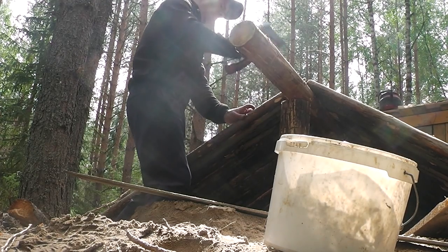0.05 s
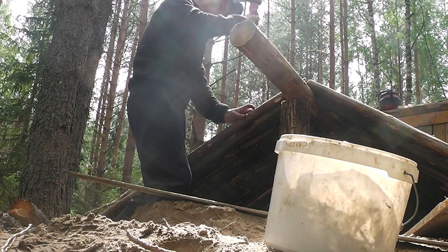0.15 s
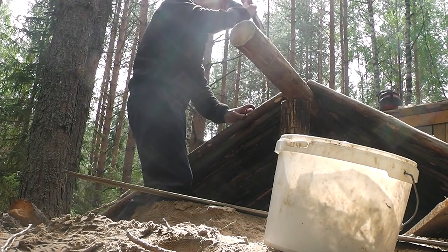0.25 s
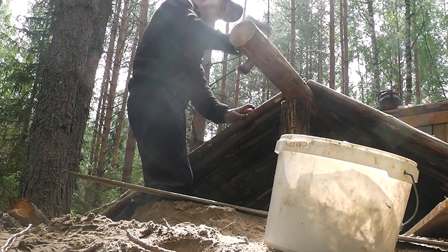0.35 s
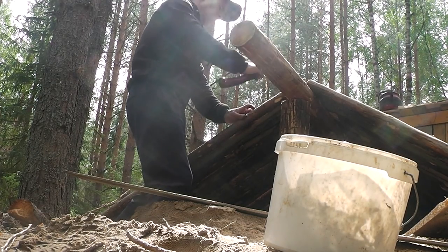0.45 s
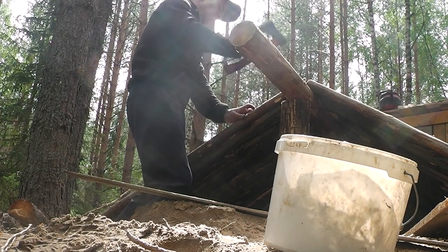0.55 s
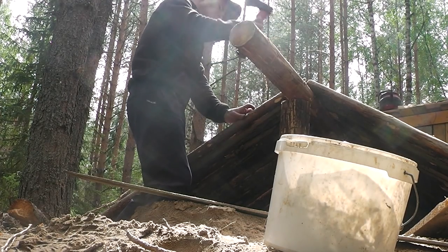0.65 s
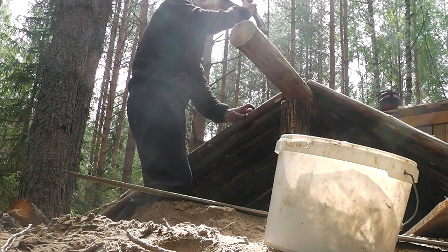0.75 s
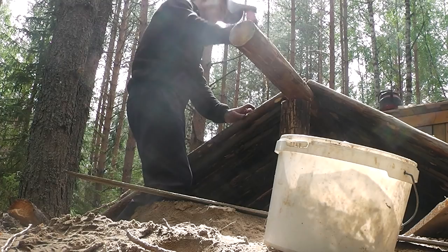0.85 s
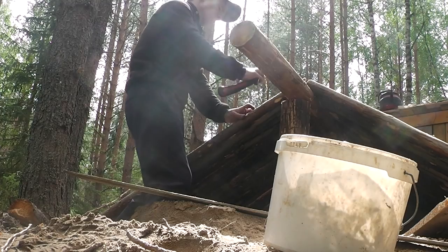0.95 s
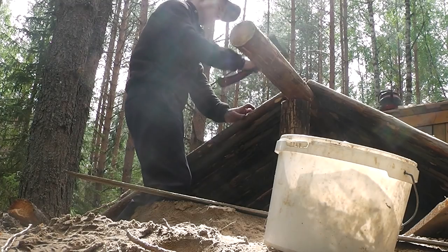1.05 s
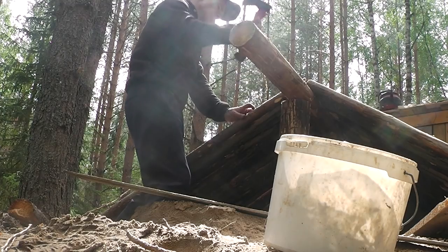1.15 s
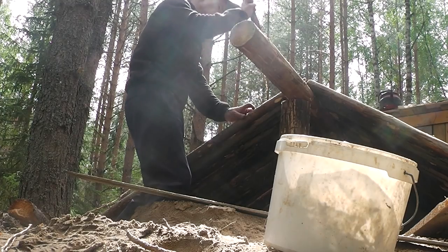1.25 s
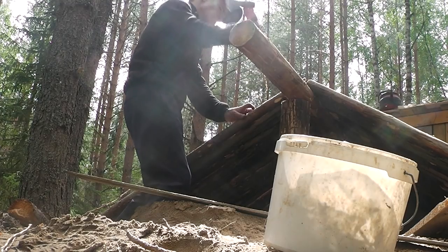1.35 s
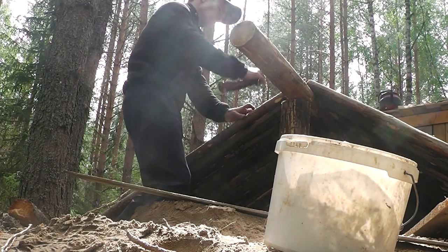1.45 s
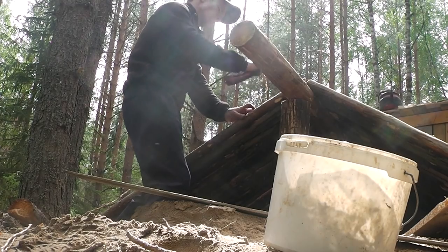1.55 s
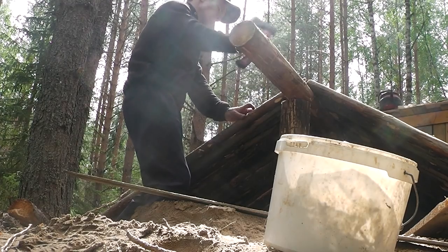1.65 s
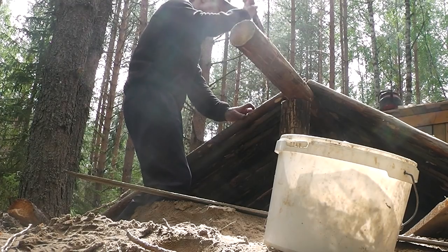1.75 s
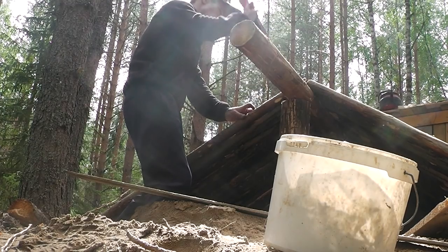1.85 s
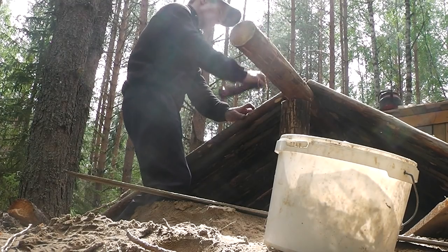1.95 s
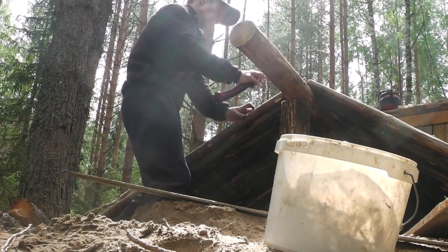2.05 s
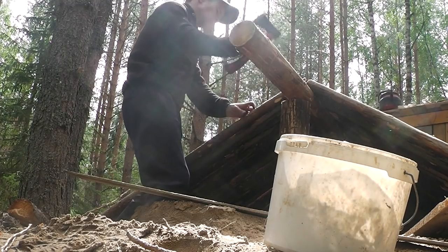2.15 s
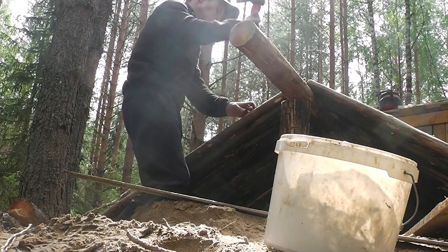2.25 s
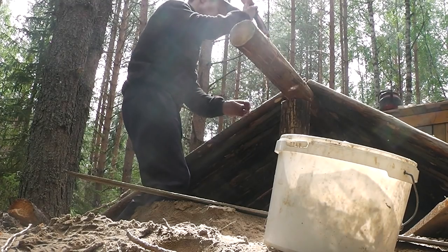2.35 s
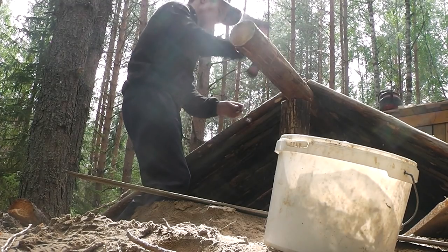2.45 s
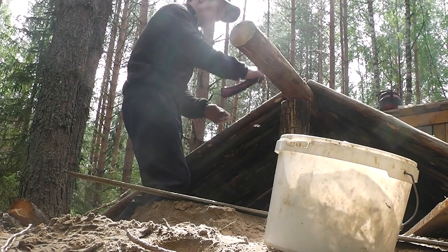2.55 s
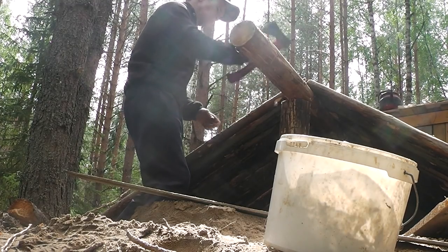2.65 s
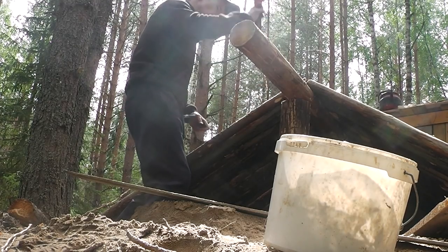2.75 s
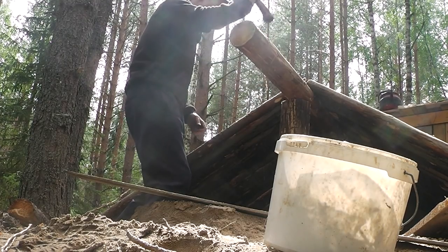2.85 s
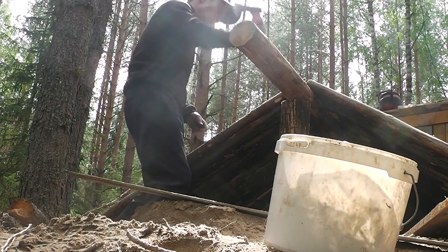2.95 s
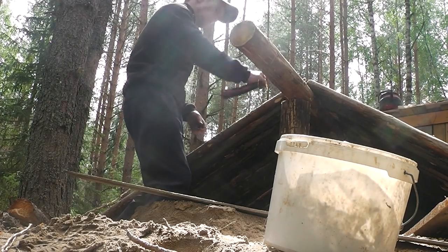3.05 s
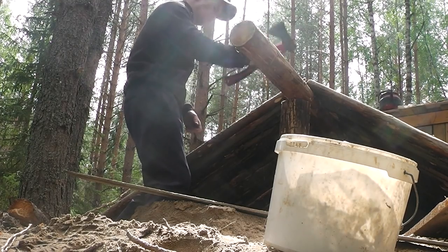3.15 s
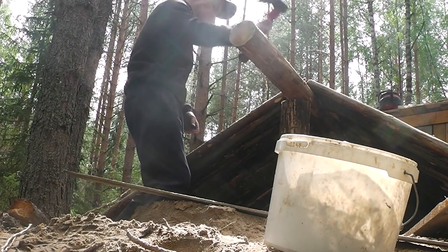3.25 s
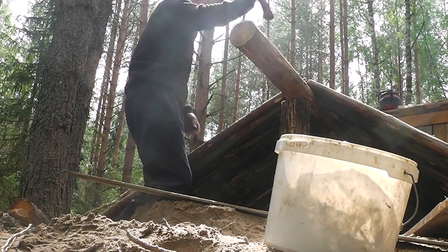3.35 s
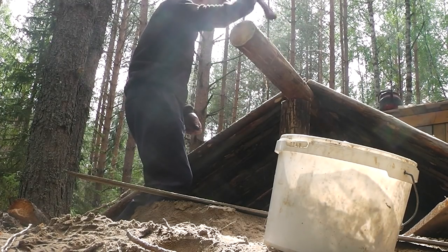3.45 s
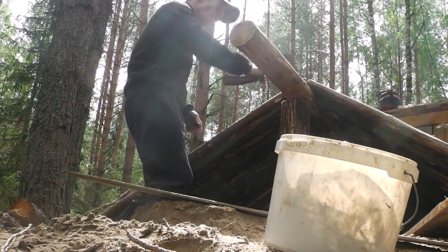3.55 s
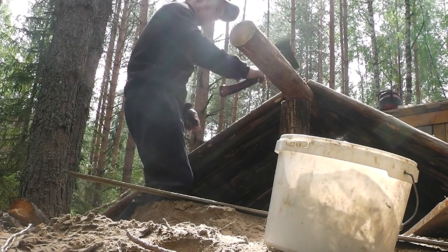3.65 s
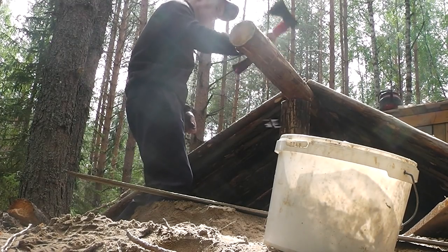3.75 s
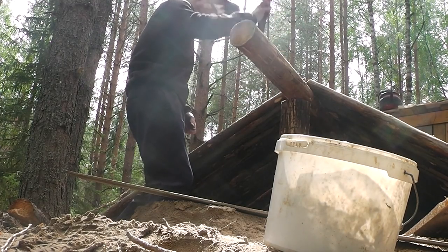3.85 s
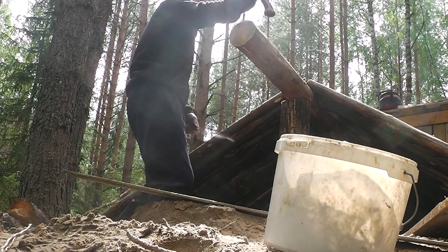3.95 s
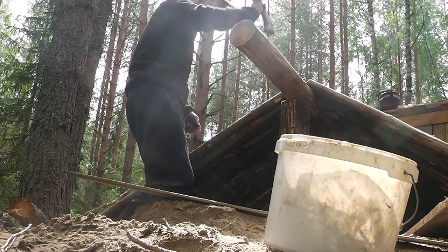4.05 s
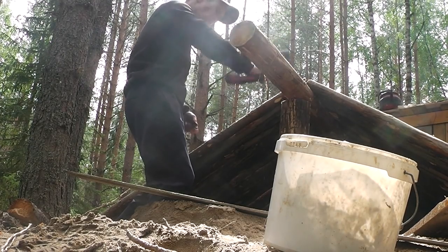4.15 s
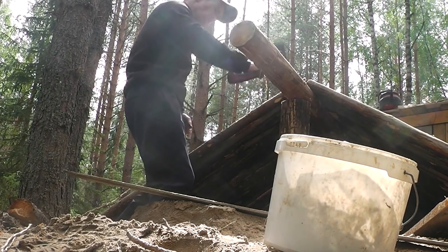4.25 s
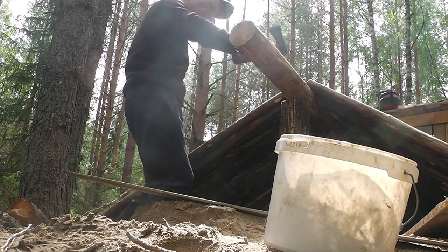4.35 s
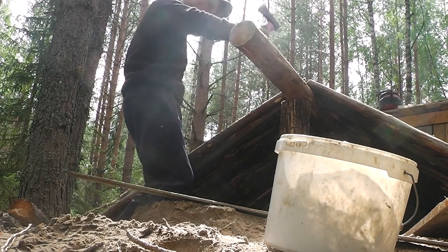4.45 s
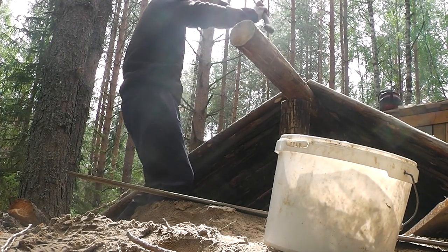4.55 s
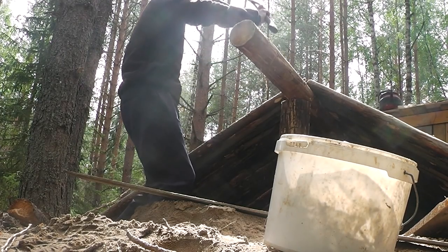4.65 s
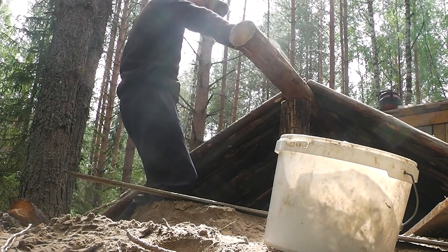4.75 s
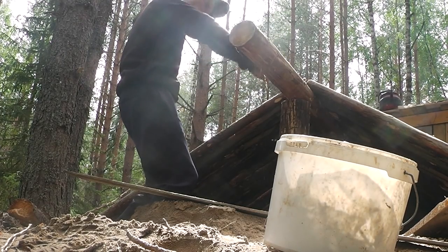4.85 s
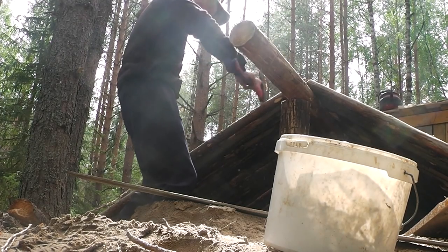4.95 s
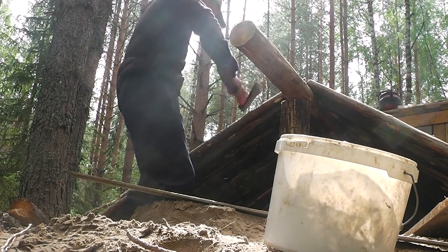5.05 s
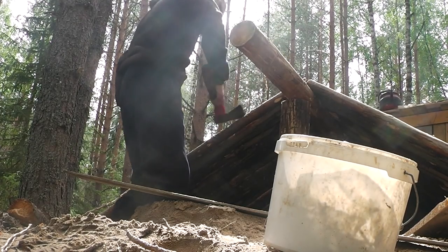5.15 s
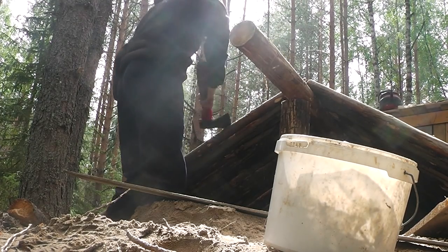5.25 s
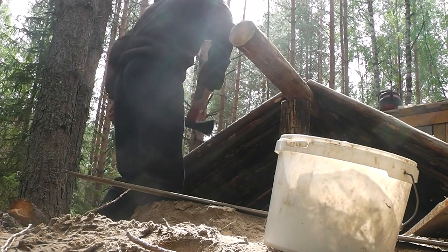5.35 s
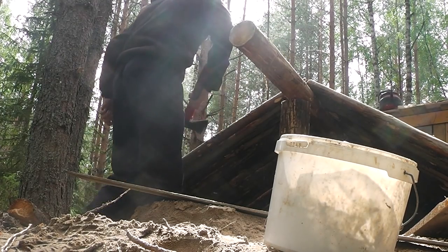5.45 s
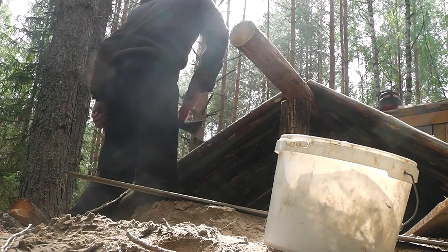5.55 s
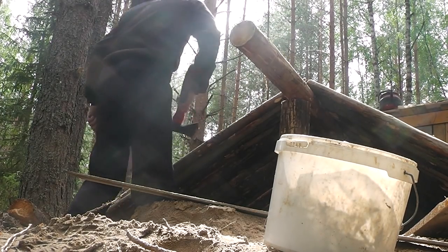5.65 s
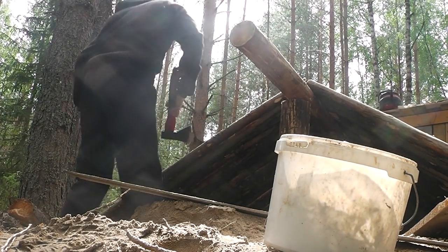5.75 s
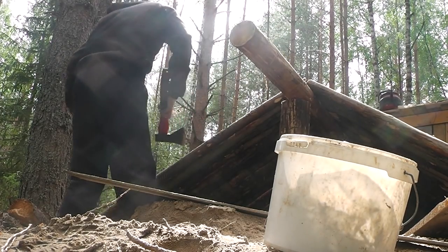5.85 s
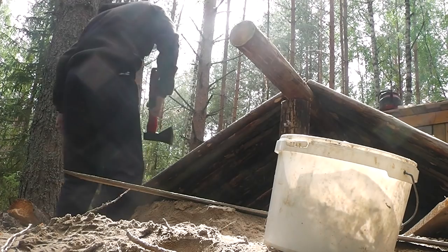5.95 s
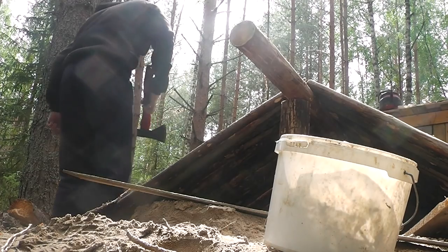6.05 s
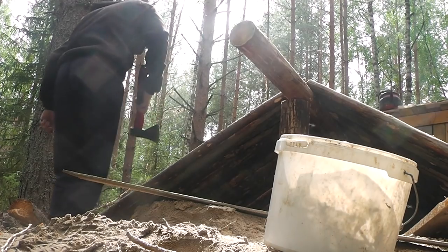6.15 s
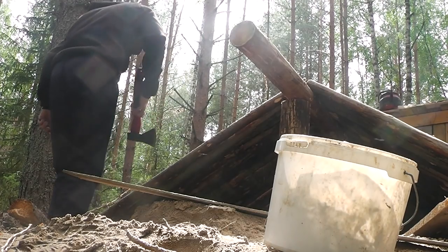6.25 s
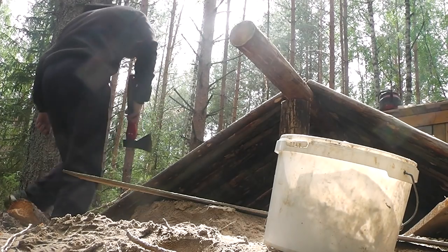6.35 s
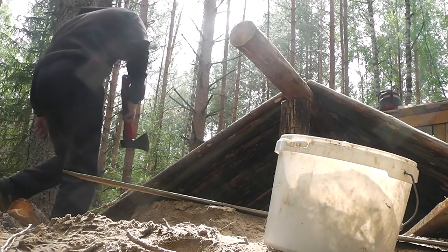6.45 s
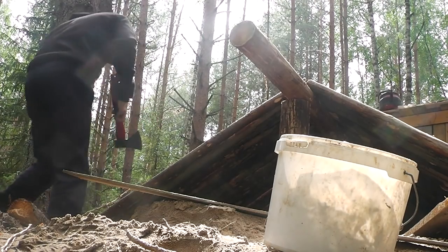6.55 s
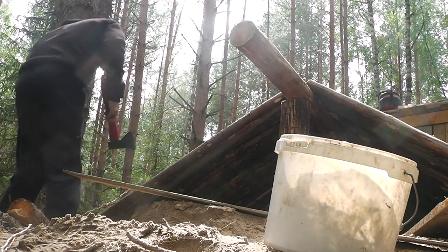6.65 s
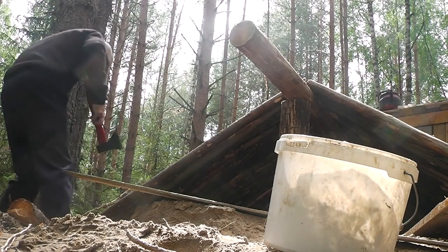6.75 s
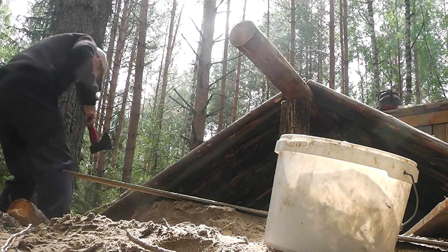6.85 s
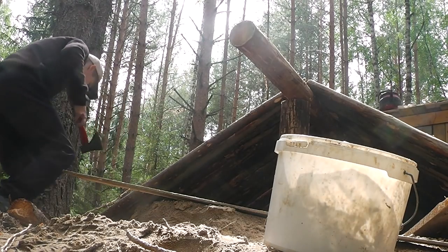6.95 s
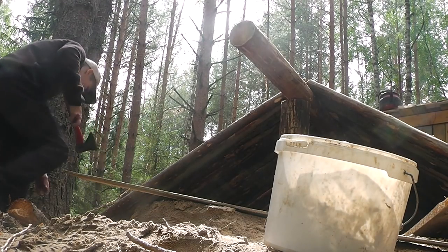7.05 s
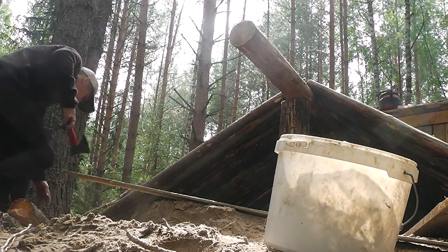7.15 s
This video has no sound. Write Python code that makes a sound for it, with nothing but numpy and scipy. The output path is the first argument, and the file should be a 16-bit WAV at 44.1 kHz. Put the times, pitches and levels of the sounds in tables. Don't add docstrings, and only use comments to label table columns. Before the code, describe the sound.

Close outdoor chopping in a pine forest: a hatchet hits a raised log about twice a second, each blow a punchy knock with a splintering crack, short hollow wood ring and long scatter from the trunks. After the last, hardest blow the head taps down on a plank roof, chips tick, and boots thump softly on dry litter under light wind.

```python
import sys
import numpy as np
from scipy import signal
from scipy.io import wavfile

SR = 44100
rng = np.random.default_rng(int(sys.argv[2]) if len(sys.argv) > 2 else 0)


def voltage_ratio(level):
    return 10 ** (np.asarray(level, float) / 20)


def store_wav(level_fs):
    pcm = np.round(np.clip(np.atleast_2d(level_fs), -1, 1) * 32767)
    wavfile.write(sys.argv[1], SR, pcm.T.astype(np.int16))


N = 317520
LEAD = 2048

BLOW_TIMES = [-.016, .50351, 1.01354, 1.53331, 2.05048, 2.58803, 3.11819, 3.65812, 4.23646, 4.87871]
# wood in dB, crack in dB, deep modes in dB, thud in dB.
BLOW_LEVELS = [
    (-6, -16, -24, -7),
    (-2.5, -14.5, -28.5, -2),
    (-5.5, -16, -19, -3),
    (-6.5, -13, -19, -6.5),
    (-11, -14.5, -21.5, -7),
    (-7.5, -14, -20.5, -4),
    (-7, -12.5, -20, -2),
    (-8.5, -14, -19, -1),
    (-7.5, -15, -7.5, -1),
    (-1.5, -17.5, -11, 0),
]


def force_db():
    usual_wood_db = -7
    return np.transpose(BLOW_LEVELS)[0] - usual_wood_db


def with_notch(pair):
    progress = np.interp(BLOW_TIMES, [BLOW_TIMES[0], BLOW_TIMES[-1]], [0, 1])
    return pair[0] + (pair[1] - pair[0]) * progress ** 0.7


def rms_one(x):
    return x / np.sqrt(np.mean(x ** 2) + 1e-20)


def at_hz(points, hz):
    table_hz, value = np.transpose(points)
    return np.interp(np.log(hz), np.log(table_hz), value)


def hump_db(hz, centre_hz, octaves):
    return -10 * (np.log2(hz / centre_hz) / octaves) ** 2


def bandpass(x, low_hz, high_hz):
    return signal.sosfilt(signal.butter(2, [low_hz, high_hz], "band", fs=SR, output="sos"), x)


def soft(x, cut_hz):
    return signal.sosfilt(signal.butter(2, cut_hz, fs=SR, output="sos"), x)


def strikes(times, sizes):
    train = np.full(N + LEAD, 1e-18)
    np.add.at(train, np.round(np.asarray(times) * SR).astype(int) + LEAD, sizes)
    return train


def ring(train, hz, t60):
    radius, angle = voltage_ratio(-60 / (t60 * SR)), 2 * np.pi * hz / SR
    return signal.lfilter([0, np.sin(angle)], [1, -2 * radius * np.cos(angle), radius * radius], train)[LEAD:]


def dying(power_train, t60, rise_s):
    fall, swell = voltage_ratio(-120 / (t60 * SR)), np.exp(-1 / (rise_s * SR))
    return signal.lfilter([1 - swell], np.convolve([1, -fall], [1, -swell]), power_train)[LEAD:]


def flutter(rate, db):
    hop = 40
    pole = np.exp(-2 * np.pi * rate * hop / SR)
    slow = signal.lfilter([1], [1, -2 * pole, pole * pole], rng.standard_normal(N // hop + 2002))
    slow = slow[2000:]
    return np.interp(np.arange(N) / hop, np.arange(len(slow)), voltage_ratio(2 * db * rms_one(slow)))


def push():
    lobe_s, lobe_gap_s, bounce_s = 0.00022, 0.00062, 0.0048
    s, rebound = np.array(BLOW_TIMES), np.clip(with_notch((0.11, 1.05)), 0, 1)
    push_db = -4 + 0.39 * force_db()
    bounce_db = np.minimum(-7 + 1.6 * force_db(), -1)
    size, back = voltage_ratio(push_db), voltage_ratio(push_db + bounce_db - 3)
    train = strikes(s + lobe_gap_s, size * rebound) - strikes(s, size)
    train += strikes(s + bounce_s - 0.0005, 0.65 * back)
    train -= strikes(s + bounce_s, back)
    train += strikes(s + bounce_s + 0.00037, 0.44 * back)
    x = np.arange(-40, 41) / (lobe_s * SR)
    lobe, spike = np.exp(-0.5 * x ** 2), np.exp(-1.5 * x ** 2)
    swell = np.convolve(strikes(s - lobe_gap_s, size * 0.55), spike, "same")
    return (np.convolve(train, lobe, "same") + swell)[LEAD:]


def crack_power(hz):
    # frequency in Hz, level in dB per Hz.
    crack_spectrum = [(1060, -43), (1800, -14.5), (3320, -9.5), (5010, -5.5), (8280, -8.5), (9080, 3),
                      (9860, -12.5), (11000, -8.5), (16000, -23)]
    crack_db = np.transpose(BLOW_LEVELS)[1]
    lag_ms = with_notch((0.32, -1.2))
    tear_db = with_notch((-8.5, 6.5)) + 1.5 if hz < 3800 else 0.22 * hump_db(hz, 9000, 0.79)
    power = voltage_ratio(2 * (crack_db + tear_db + at_hz(crack_spectrum, hz) + 15))
    return dying(strikes(np.array(BLOW_TIMES) + lag_ms / 1000, power), 0.012, 0.0005)


def wood():
    # frequency in Hz, level in dB, t60 in seconds.
    wood_modes = [(76, -30, 0.33), (89.4, -17.5, 0.11), (132, -25.5, 0.12), (200.4, -13, 0.15),
                  (270, -9, 0.085), (337.2, -8.5, 0.13), (416.7, -6, 0.11), (467, -30.5, 0.036),
                  (493, -24.5, 0.091), (581, -17, 0.13), (647, -23, 0.071), (770, -24.5, 0.13),
                  (827, -23, 0.12), (955, -20.5, 0.14), (1028, -12, 0.048), (1133, -22.5, 0.13),
                  (1133, -21.5, .12), (1229.5, -13.5, 0.056), (1385, -32.5, 0.074), (1590, -24.5, 0.062),
                  (1720, -18.5, 0.028), (1888, -31.5, 0.11)]
    s, (wood_db, _, deep_db, thud_db) = np.array(BLOW_TIMES), np.transpose(BLOW_LEVELS)
    out = np.zeros((2, N))
    luck = rng.uniform(-1, 1, (len(s), len(wood_modes), 2))
    place = rng.uniform(-1, 1, len(wood_modes))
    for k, (hz, level_db, t60) in enumerate(wood_modes):
        if hz < 160:
            reach_db = thud_db - 4.5
        else:
            reach_db = wood_db + deep_db * (hz < 440)
        size = voltage_ratio(reach_db + level_db + 4 * luck[:, k, 0])
        late_s = 0.00391 + 0.003124 * luck[:, k, 1]
        lean_db = (2.5 if hz > 160 else 0.8) * place[k]
        out += ring(strikes(s + late_s, size * (-1) ** k), hz, t60) * voltage_ratio([[lean_db], [-lean_db]])
    return soft(out, 2600)


def roof_tap():
    # frequency in Hz, level in dB, t60 in seconds.
    plank_modes = [(96, -18, 0.18), (142, -12.5, 0.15), (258, -9, 0.2), (430, -14, 0.18), (588, 3, 0.082),
                   (807, -15.5, 0.13), (1250, -36, 0.32)]
    out = np.zeros(N)
    for hz, db, t60 in plank_modes:
        out += ring(strikes([5.2924], np.sign(hz - 300) * voltage_ratio(-20 + db)), hz, t60)
    return soft(soft(out, 1000), 2600) * voltage_ratio([[0.3], [-0.3]])


def steel_head():
    # time in seconds, low mode in dB, high mode in dB, t60 of the high mode in seconds.
    free_hits = [
        (1.014, -56.5, -36.5, .14),
        (1.534, -40, -33, .13),
        (2.051, -41, -59.5, .1),
        (2.589, -48, -59, .1),
        (5.292, -67, -47.5, 0.27),
        (5.33, -62, -61, 0.36),
    ]
    out = np.zeros(N)
    for s, low_db, high_db, t60 in free_hits:
        out += ring(strikes([s], voltage_ratio(low_db)), 4956, 0.35)
        out += ring(strikes([s], voltage_ratio(high_db)), 9186, t60)
    return out * np.interp(np.arange(N) / SR, [5.41, 5.44], [1, 0.05])


def ground_wave():
    delay_s, length_s, first_hz, last_hz = 0.07, 0.33, 36, 50
    part = np.linspace(0, 1, int(length_s * SR))
    glide_hz = first_hz + (last_hz - first_hz) * part ** 1.14
    wave = np.sin(2 * np.pi * np.cumsum(glide_hz) / SR) * np.sin(np.pi * part ** 0.94) ** 1.05
    size = voltage_ratio(with_notch((-47.5, -55.5)) + 0.8 * force_db())
    return signal.fftconvolve(strikes(np.array(BLOW_TIMES) + delay_s, size), wave)[LEAD:LEAD + N]


def near_power(hz):
    # frequency in Hz, level in dB per Hz.
    near_spectrum = [(24, -42), (40, -6.5), (312, -9.5), (790, -3), (896, -3.5), (1070, 1), (1760, -12.5),
                     (2440, -34), (3560, -29.5), (4800, -13), (5870, -19.5), (9450, -16.5), (16000, -40)]
    # frequency in Hz, t60 in seconds.
    near_decay = [(60, .22), (200, 0.22), (400, 0.22), (1000, 0.22), (3000, 0.065), (8000, 0.12),
                  (15000, 0.2)]
    wood_db, crack_db, _, _ = np.transpose(BLOW_LEVELS)
    sharp_db = crack_db + 7 if hz > 2200 else wood_db
    power = voltage_ratio(2 * (sharp_db + at_hz(near_spectrum, hz) - 1.5))
    return dying(strikes(BLOW_TIMES, power), at_hz(near_decay, hz), 0.00099)


def trunk_power(hz):
    # frequency in Hz, level in dB per Hz.
    far_spectrum = [(24, -28.5), (40, 4.5), (127, -8.5), (199, -23), (220, -41), (402, -19), (529, -27),
                    (1040, -18), (1720, -23.5), (2570, -41.5), (5050, -24.5), (9220, -28.5), (13000, -43.5),
                    (16000, -58.5)]
    # frequency in Hz, t60 in seconds.
    far_decay = [(60, .7), (300, 0.48), (1000, 2.08), (2500, 1.92), (5000, 0.64), (8000, .55), (15000, .3)]
    if hz > 2200:
        far_db = np.transpose(BLOW_LEVELS)[1] - 19.5
    else:
        rumble_db = with_notch((0.5, -5)) * (hz < 60)
        far_db = -36 + force_db() + rumble_db
    power = voltage_ratio(2 * (far_db + 6.1 * (hz / 12000) ** 4 + at_hz(far_spectrum, hz) + 21.5))
    return dying(strikes(BLOW_TIMES, power), at_hz(far_decay, hz), 0.02)


def squeals():
    # time in seconds, frequency in Hz, width in Hz, level in dB, t60 in seconds.
    fibre_squeals = [
        (-.009, 4880, 583, -51, 0.7),
        (0.503, 5600, 800, -48, 0.9),
        (1.014, 6600, 1300, -49, 0.84),
        (4.882, 3630, 1098, -53, 0.82),
    ]
    # frequency in Hz, width in Hz, level in dB, t60 in seconds.
    log_tones = [(574, 45, -65, 3), (811.3, 55, -59.5, 1.9), (1031, 60, -59, 3), (1250, 60, -63, 3.4)]
    out, white = np.zeros((2, N)), rng.standard_normal((2, N))
    luck_db = 3 * rng.uniform(-1, 1, (len(BLOW_TIMES), len(log_tones)))
    tones = []
    for s, hz, width_hz, db, t60 in fibre_squeals:
        tones.append(([s], hz, width_hz, db, t60, 0.013))
        tones.append(([s], hz, width_hz, db + 21, 0.034, 0.001))
    for k, (hz, width_hz, db, t60) in enumerate(log_tones):
        tones.append((BLOW_TIMES, hz, width_hz, db + 0.6 * force_db() + luck_db[:, k], t60, 0.15))
    for s, hz, width_hz, db, t60, rise_s in tones:
        mid, side = rms_one(bandpass(white, hz - width_hz / 2, hz + width_hz / 2))
        power = dying(strikes(s, voltage_ratio(2 * db)), t60, rise_s) * flutter(3.3, 2.0)
        out += np.sqrt(power) * (mid + 0.27 * side * [[1], [-1]])
    return out


def litter_ticks():
    # time in seconds, peak in dB, centre in Hz, t60 in seconds.
    chip_ticks = [(.915, -47, 9810, .015), (2.029, -41, 9200, 0.02), (3.078, -47.5, 10100, 0.016),
                  (5.005, -43.5, 11630, 0.017), (5.015, -39, 10700, 0.012), (5.244, -53.5, 8500, 0.084),
                  (5.291, -36.5, 9500, 0.022), (5.326, -45, 11000, 0.011), (5.334, -37, 3920, 0.013),
                  (5.342, -46, 11480, 0.02), (5.362, -48, 10500, 0.014), (5.387, -42.5, 9800, .025),
                  (5.436, -47, 6840, 0.012), (5.69, -57, 9000, .08), (5.739, -42.5, 10700, 0.05),
                  (5.89, -61, 10000, 0.12), (5.925, -58, 9700, 0.09), (6.201, -53, 4700, 0.05),
                  (6.203, -54, 10000, 0.1), (6.33, -58, 10000, 0.043), (6.72, -58.5, 9440, 0.057),
                  (6.984, -53, 11300, .015)]
    grains = [(5 + 0.95 * a, -49 - 8 * b, 3400 * 2 ** (c - 0.5), 0.012) for a, b, c in rng.random((50, 3))]
    return chip_ticks + grains


def puffs(table, hz, octaves, rise_s, lift_db, skirt_db):
    out = np.zeros(N)
    for s, db, centre_hz, t60 in table:
        start, t = int(s * SR), np.arange(int(t60 * SR)) / SR
        colour_db = max(hump_db(hz, centre_hz, octaves), skirt_db)
        shape = voltage_ratio(2 * (db + lift_db + colour_db - 60 * t / t60)) * (1 - np.exp(-t / rise_s))
        out[start:start + len(t)] += shape[:N - start]
    return out


def boot_power(hz):
    # time in seconds, peak in dB, centre in Hz, t60 in seconds.
    boot_steps = [(5.009, -42, 292, 0.26), (5.009, -32.5, 92, 0.24), (5.292, -33, 564, 0.17),
                  (5.35, -40.5, 102, 0.36), (5.81, -47, 88, 0.11), (6.199, -46, 350, 0.08),
                  (6.2, -55, 1000, 0.079), (6.218, -37, 94, 0.17), (6.328, -52.5, 726, 0.16),
                  (6.708, -56, 786, 0.14), (6.724, -36.5, 460, 0.067), (6.742, -35, 75, 0.23),
                  (7.15, -47.5, 70, 0.24)]
    return puffs(boot_steps, hz, 0.87, 0.0026, 19.0, skirt_db=-71)


def gain_dip():
    recover_s = 0.16
    held = 2.6 * dying(strikes(BLOW_TIMES, 0.75), np.log(1000) * 2 * recover_s, 0.01)
    return voltage_ratio(2 * np.minimum(held, 1))


def air_power(hz, duck):
    # frequency in Hz, level in dB per Hz.
    air_spectrum = [(12, -31), (20, -4.5), (53, 2.5), (114, -11), (184, -9), (243, -12), (341, -6),
                    (597, -9.5), (910, -11.5), (1840, -21.5), (2640, -33.5), (4510, -25), (9890, -29),
                    (15100, -31), (16400, -48)]
    # time in seconds, level in dB, gust lift of the middle in dB.
    air_levels = [
        (0, -53, 8),
        (2.501, -55.5, 4.5),
        (5, -54, 5),
        (6, -55, 3.5),
        (7.2, -56, 1),
    ]
    # frequency in Hz, dip in dB.
    air_dip = [(60, -5.5), (300, -13), (1000, -6.5), (3000, -3.5), (8000, -7.5), (12000, -12.5),
               (15000, -21.5)]
    when, air_db, gust_db = np.transpose(air_levels)
    calm = voltage_ratio(2 * (air_db + gust_db * voltage_ratio(hump_db(hz, 1200, 0.41)) + at_hz(air_spectrum, hz) + 17.5))
    return np.interp(np.arange(N) / SR, when, calm) * flutter(10, 0.7) * duck ** at_hz(air_dip, hz)


def scatter():
    # frequency in Hz, side minus mid in dB.
    blow_side = [(60, -14), (150, -19.5), (380, -14.5), (950, -20.5), (2380, -8.5), (5980, -5.5),
                 (15000, -5.5)]
    # frequency in Hz, side minus mid in dB.
    air_side = [(60, -8.5), (150, 0.5), (380, -2), (950, -3), (2380, 4.5), (5980, 0.5), (15000, -3)]
    # frequency in Hz, left minus right in dB.
    mic_lean = [(60, 0.5), (180, 1), (550, 0.5), (1650, 0.5), (4970, 0), (15000, -2)]
    duck = gain_dip()
    tail_duck = duck ** -4
    white, together = rng.standard_normal((2, 2, N + LEAD)), flutter(2.4, 0.62)
    ticks = litter_ticks()
    edges = np.r_[np.geomspace(20, 300, num=7), np.geomspace(385, 5000, num=11), np.geomspace(5800, 15900, num=10)]
    out = np.zeros((2, N))
    for k, (low, high) in enumerate(zip(edges, edges[1:])):
        hz = np.sqrt(low * high)
        mid, side = bandpass(white[k % 2], low, high)[:, LEAD:]
        hit = near_power(hz) + trunk_power(hz) * tail_duck + boot_power(hz)
        if hz > 1800:
            hit += crack_power(hz)
        if hz > 2200:
            hit += puffs(ticks, hz, 0.36, 0.00087, 3.7, skirt_db=-12.5)
        air = air_power(hz, duck) * together
        wide = hit * voltage_ratio(2 * at_hz(blow_side, hz) - 13.0) + air * voltage_ratio(2 * at_hz(air_side, hz))
        lag = np.gradient(mid) * np.sqrt(hit) * 0.5 * (hz / 12000) ** 3
        pair = np.sqrt(hit + air) * mid + (np.sqrt(wide) * side + lag) * [[1], [-1]]
        out += pair * voltage_ratio(at_hz(mic_lean, hz) * np.array([[0.5], [-0.5]]))
    return signal.sosfilt(signal.butter(8, 15700, fs=SR, output="sos"), out)


def hush():
    early = strikes(np.array(BLOW_TIMES) - 0.014, 1)
    return 1 - 0.75 * np.convolve(early, np.ones(int(0.011 * SR)))[LEAD:LEAD + N]


def scene():
    centre = (push() + steel_head() + ground_wave()) * voltage_ratio([[0.15], [-0.15]])
    return wood() + roof_tap() + centre + (scatter() + squeals()) * hush()


def roll_off(x):
    return signal.sosfilt(signal.butter(12, 16550, fs=SR, output="sos"), x)


def record(dry):
    lost, top = 0.41, 0.97
    stopped = signal.sosfilt(signal.butter(2, [2370, 3700], "bandstop", fs=SR, output="sos"), dry)
    coloured = (1 - lost) * dry + lost * stopped
    mix = coloured / (1 + (np.abs(coloured) / top) ** 6) ** (1 / 6)
    return roll_off(mix)


dry = scene()
out = record(dry)
store_wav(out)
```